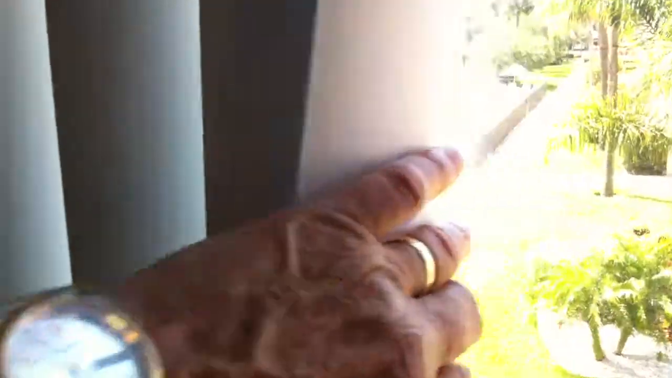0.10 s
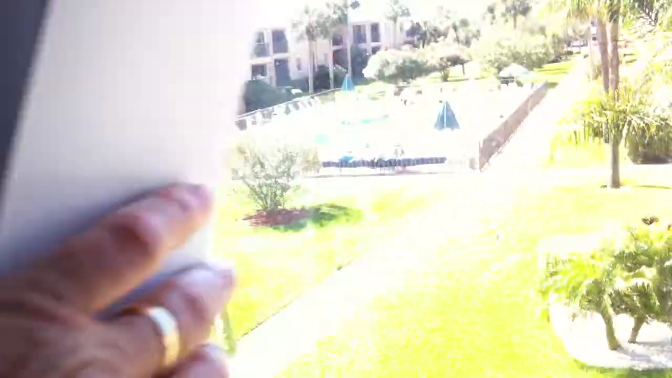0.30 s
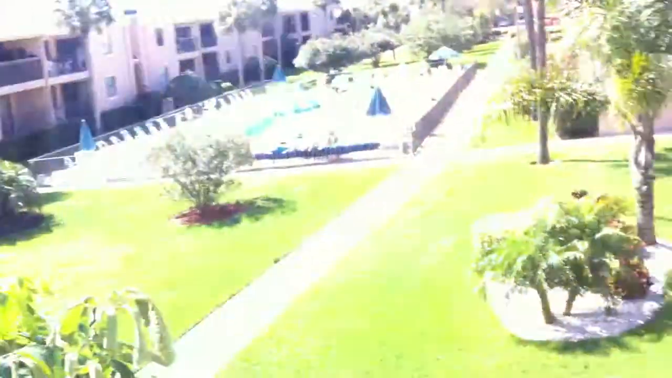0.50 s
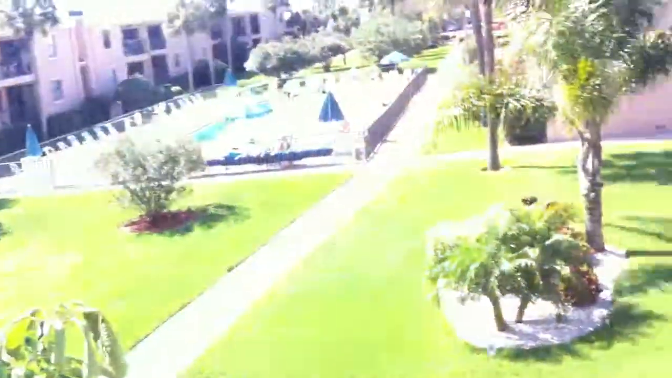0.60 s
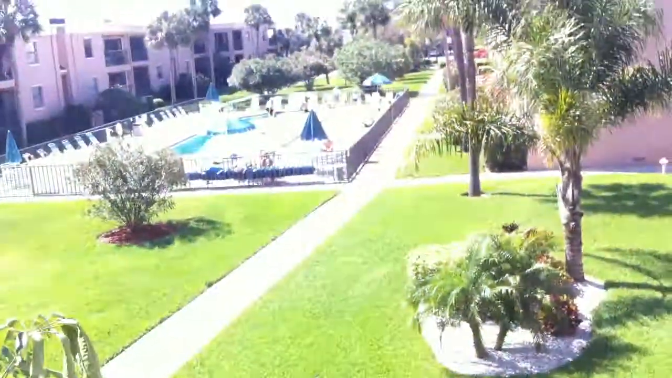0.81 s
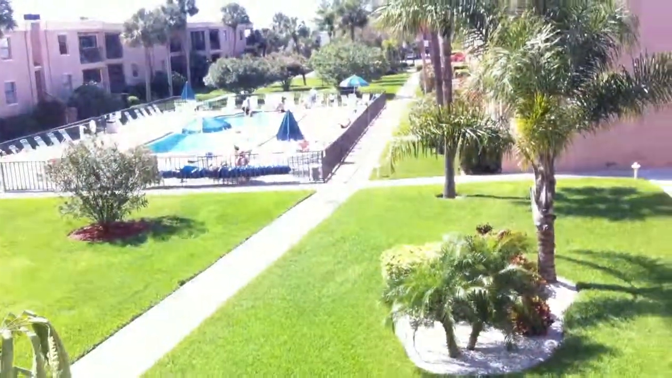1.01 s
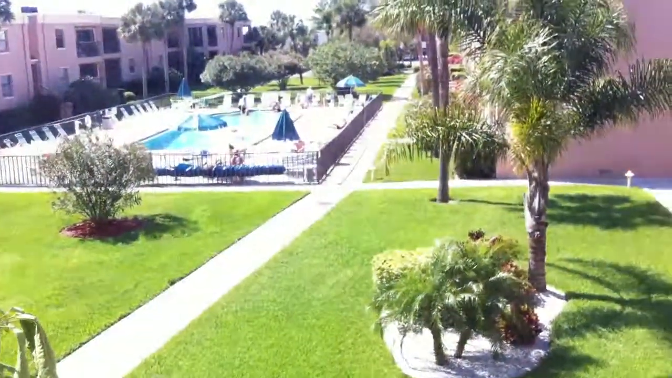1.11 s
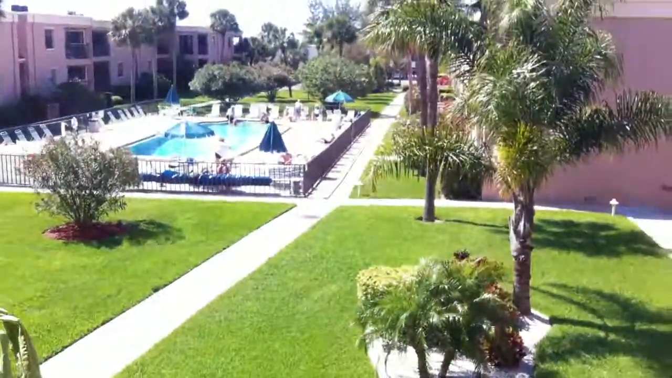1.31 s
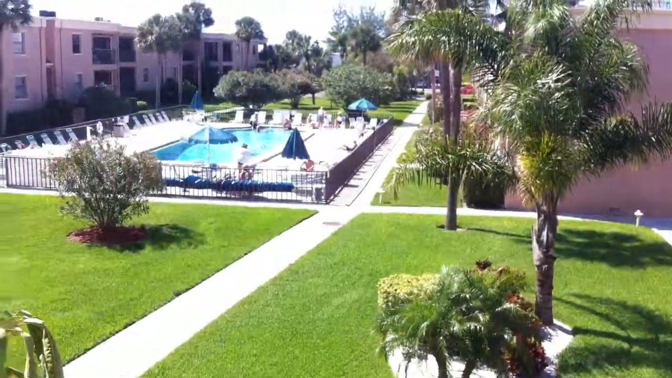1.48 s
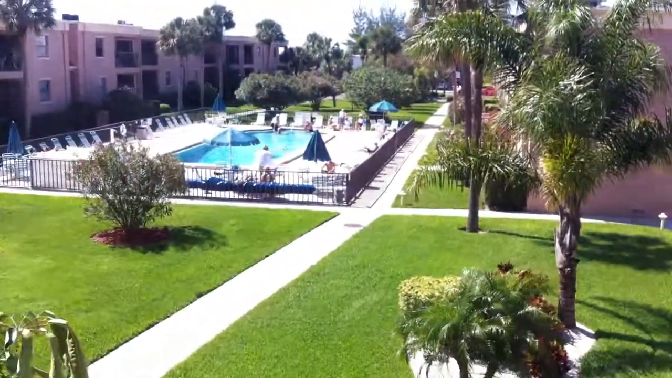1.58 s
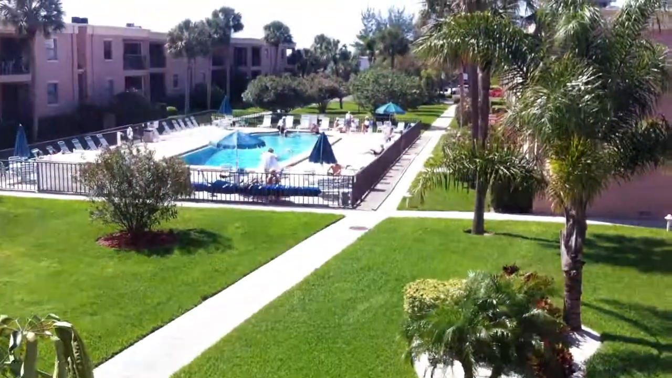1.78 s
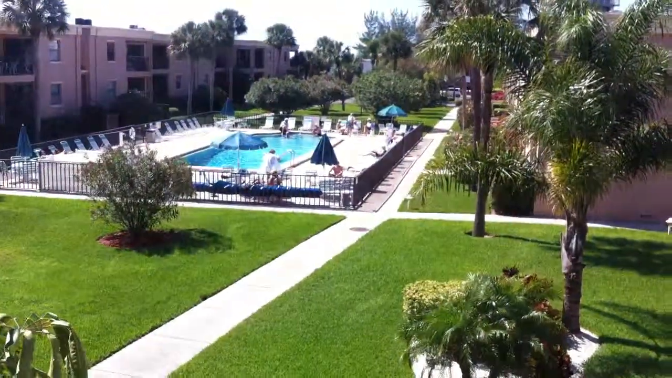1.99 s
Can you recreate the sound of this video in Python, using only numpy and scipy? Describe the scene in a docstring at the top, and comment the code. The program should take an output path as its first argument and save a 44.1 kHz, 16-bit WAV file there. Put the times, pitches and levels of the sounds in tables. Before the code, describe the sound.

Close, slightly thin mono sound of hanging plastic slats rattling in a quiet room; faint ticks first, a rush of scraping and hard clatter, another strong double clack, then thinning taps and soft rustle.

```python
"""Vertical blinds pushed aside

Vertical blinds are pushed aside close to the microphone in a quiet room.
Plastic slats scrape in a rush of tiny slips and slap together in ticks and short runs of contacts.
They swing with a low rustle and clack more lightly; duller knocks and springy low notes join in.
Each contact also rings the blind; a short room echo and steady filtered noise lie underneath."""
import sys
import numpy as np
from scipy import signal
from scipy.io import wavfile
from scipy.ndimage import uniform_filter1d

SR = 44100
rng = np.random.default_rng(int(sys.argv[2]) if len(sys.argv) > 2 else 0)


def to_wav(sig):
    """Store sig (one row per channel, or 1-D mono) as 16-bit WAV at the path in sys.argv[1].

    Samples outside -1..1 are clipped; the rate is SR.
    """
    pcm = np.clip(np.atleast_2d(sig), -1, 1) * 32767
    pcm = np.round(pcm).astype(np.int16)
    wavfile.write(sys.argv[1], SR, pcm.T)  # frames by channels


N = 88200  # length in samples: 2 s

# Spectrum tables give only the shape of a sound; its loudness is set elsewhere. Slat hitting slat, levels
# before the trims below; the first row is a sound already dying away as the scene begins: [t/s, edge tick
# level/dB, body level/dB, middle level/dB, treble level/dB, ring f/Hz, ring level over the middle/dB, chatter
# t60/s]
CLACK_EVENTS = [(0.0014, -29, -48.5, -48, -48, 2430, -6, 0.15),
                (0.047, -55.5, -58.5, -50.5, -63, 2420, -6, 0.094),
                (0.1035, -40, -71, -47, -55, 2540, -3, 0.043),
                (0.1289, -37, -47, -53, -54, 1660, -4, 0.039),
                (0.1462, -48, -78, -48, -49, 2600, -0.5, 0.1),
                (0.2345, -17, -28, -23, -20.5, 1846, -7.5, 0.025),
                (0.3186, -12, -34, -29, -17, 2460, 3, 0.051),
                (0.3353, -11, -30, -24, -26.5, 1840, -20, 0.1),
                (0.3633, -28, -30, -22.5, -51, 3080, -8, 0.082),
                (0.4046, -20, -31.5, -22, -23.5, 2240, -33, 0.12),
                (0.4861, -15, -43, -30, -37, 1570, -25, 0.093),
                (0.6724, -10, -27.5, -16, -20, 1900, -3, 0.062),
                (0.6807, -7, -27, -22, -27.5, 1710, -2.5, 0.072),
                (0.802, -39, -34, -29.5, -29.5, 1820, 3, 0.06),
                (0.8609, -33, -34.5, -36.5, -45, 1940, -3, 0.044),
                (0.8704, -19, -39.5, -44, -52, 1740, 2, 0.065),
                (0.9339, -10, -44, -37, -36.5, 3460, -20, 0.078),
                (0.9407, -44, -43.5, -35, -39, 1725, 1, 0.056),
                (0.9891, -35, -39.5, -33.5, -37.5, 1700, 0, 0.058),
                (0.9984, -25, -48, -33, -38.5, 1620, -5, 0.075),
                (1.0209, -25, -48, -31.5, -45, 1740, -34, 0.066),
                (1.0647, -27, -43.5, -41, -43, 1960, -23, 0.11),
                (1.1022, -30, -67, -39, -46, 2180, -2, 0.044),
                (1.1143, -28, -62, -33.5, -35.5, 2460, -8.5, 0.05),
                (1.1477, -18.5, -65, -34, -35, 1640, -0.5, 0.06),
                (1.2134, -25, -44.5, -44, -46.5, 2470, -2.5, 0.086),
                (1.2334, -28.5, -53, -35, -55, 2020, -9.5, 0.032),
                (1.272, -42, -50, -51, -58, 2700, -11, 0.052),
                (1.3004, -34, -57, -42, -47, 1720, -10, 0.077),
                (1.3886, -27, -33.5, -33, -53, 1510, 2.5, 0.062),
                (1.5314, -34, -56, -49, -46.5, 3290, 4, 0.054),
                (1.5788, -43, -51, -62, -46, 2420, 4, 0.044), (1.611, -40, -66, -60, -44, 2570, 3, 0.036),
                (1.6693, -40, -70, -52, -48, 1600, 1, 0.06),
                (1.6802, -42, -68, -49.5, -48, 2270, 1.5, 0.041),
                (1.763, -33, -60, -47, -49.5, 1640, -16, 0.1),
                (1.8398, -34, -45, -45.5, -49, 2820, -9, 0.043),
                (1.8578, -33, -56, -49, -53, 2920, -3, 0.11),
                (1.9019, -61, -51, -43.5, -50, 2560, -12, 0.028)]
# Spectra of the low, middle and high parts of a clack: [f/Hz, level per Hz/dB]
BODY_SPECTRUM = [(60, -57), (130, -6), (300, -2), (480, 0), (700, 0.5), (1100, 3), (1800, -9.5),
                 (5000, -63)]
MIDDLE_SPECTRUM = [(300, -27.5), (900, -6), (1300, -7), (1800, 3.5), (2700, -0.5), (3600, -4), (5500, -7.5),
                   (12000, -48.5)]
TREBLE_SPECTRUM = [(1000, -42), (3000, -22), (4500, 3.5), (6500, 0.5), (9000, -1), (12000, -7),
                   (16000, -11.5)]
# Spectrum of the edge tick: [f/Hz, level per Hz/dB]
TICK_SPECTRUM = [(100, -4), (600, -12), (2000, -9), (3300, 27.5), (5000, 9), (9000, 10.5), (16000, -33)]
# Dull knocks of whole slats: [t/s, level/dB, t60/s]
KNOCK_EVENTS = [(.235, -30.5, 0.024), (.674, -30, 0.038), (.682, -30.5, 0.04), (.862, -39.5, 0.14),
                (1.225, -60, 0.069), (1.374, -39.5, 0.076), (1.3845, -33, 0.035), (1.389, -32.5, 0.048),
                (1.418, -44.5, 0.057), (1.444, -47.5, 0.099), (1.528, -58, .1), (1.581, -54.5, 0.065),
                (1.701, -36, 0.12), (1.723, -40, 0.059), (1.735, -38.5, 0.065), (1.764, -62, 0.055),
                (1.885, -51, 0.089)]
# Spectrum of the noisy part of a knock: [f/Hz, level per Hz/dB]
KNOCK_SPECTRUM = [(60, -27.5), (150, -8.5), (330, -1.5), (620, -2), (900, 0.5), (1500, -12), (2300, -11.5),
                  (4200, -14), (8000, -25), (16000, -36)]
# Low notes of a knocked slat: [f/Hz, level within the knock/dB, t60/s]
SLAT_MODES = [(267, -10.5, 0.035), (524, -19.5, 0.26), (644, -4, 0.075), (758, -8.5, 0.071),
              (1040, -25, 0.043), (1110, -34, 0.2), (1297, -8, 0.085), (1554, -13, 0.029),
              (1622, -2.5, 0.036)]
# Low bending notes of slats that spring back: [t/s, level before doubling/dB, f/Hz]
FLEX_EVENTS = [(.235, -38, 644), (0.235, -42.5, 275), (0.323, -43.5, 138), (.360, -35.5, 613),
               (0.401, -47.5, 160), (.674, -37, 385), (.677, -32, 455.5), (0.687, -36, 152.4),
               (.885, -45, 399), (1.066, -44, 193.5), (1.272, -51.5, 185), (1.392, -47.5, 205),
               (1.579, -52, 144), (1.894, -55, 182)]
# Loudness curve of slats sliding over each other, before the waver: [t/s, level/dB]
SLIDE_LEVEL = [(.232, -92), (0.24, -31), (.258, -28), (.283, -32.5), (.313, -30), (0.324, -21.5),
               (.332, -29), (.345, -30), (.385, -34), (.402, -31.5), (.412, -25.5), (.424, -38), (.44, -34),
               (.465, -42), (.51, -38.5), (.575, -41), (0.648, -44.5), (.70, -65), (0.724, -35.5),
               (.76, -63), (.85, -46), (.875, -37.5), (.89, -52.5), (1.15, -60), (1.3, -80), (1.57, -77),
               (1.614, -47.5), (1.64, -64.5), (2, -94)]
# Spectrum of the scraping: [f/Hz, level per Hz/dB]
SCRAPE_SPECTRUM = [(80, -32), (200, -18), (600, -8), (1100, -2.5), (1900, 4.5), (3300, 2.5), (5800, 2),
                   (9000, 0), (12000, -3.5), (16000, -11.5)]
# Resonances of the slats and their rail: [f/Hz, gain/dB, t60/s]
BLIND_MODES = [(487, -10, 0.21), (624, -0.5, 0.086), (1120, -5.5, 0.091), (1440, -30, 0.26),
               (1795, -11.5, 0.038), (2310, -21, 0.15), (2395, 1.5, 0.14), (2580, -3, 0.5),
               (3030, -14, 0.3), (5557, 6.5, 0.21), (5780, -1, 0.17)]
# How long the room echo lasts at each frequency: [f/Hz, t60/s]
ROOM_DECAY = [(100, 0.57), (400, 0.53), (900, 0.25), (1600, 0.3), (3000, 0.38), (9000, 0.25), (16000, 0.31)]
# Spectrum of the quiet room: [f/Hz, level per Hz/dB]
HUSH_SPECTRUM = [(25, -15), (50, -48), (95, -10), (125, -3), (185, 7), (240, 1.5), (450, -8), (900, -11),
                 (2400, -5.5), (5000, -13), (10000, -16), (16000, -22)]
# Loudness curve of the rustle of the swaying slats: [t/s, level/dB]
SWAY_LEVEL = [(0, -51.5), (.07, -74), (.15, -56), (.22, -68.5), (.33, -45.5), (.44, -50), (.52, -55),
              (.62, -57.5), (.78, -56), (.88, -51), (.96, -58), (1.161, -54), (1.25, -65.5), (1.35, -63.5),
              (1.45, -61), (1.6, -60.5), (1.66, -86), (1.76, -56), (2, -70.5)]
# Spectrum of that rustle: [f/Hz, level per Hz/dB]
SWAY_SPECTRUM = [(30, -3), (80, -15), (140, -9.5), (200, 0.5), (340, 4.5), (500, -6), (1000, -4),
                 (2500, -29.5), (8000, -33)]

# t60 is the time a sound takes to die away by 60 dB.
BODY_TRIM_DB, MIDDLE_TRIM_DB, TREBLE_TRIM_DB, TICK_TRIM_DB = -2.5, -2.5, 0, -10
BODY_LINGER = 1.67  # the body's t60 as a multiple of the chatter's
CHATTER_RISE_S, CHATTER_GRAIN_DB = 0.00083, 5.5
REBOUND_S, REBOUND_DB = 0.002, 2
RING_T60_S, RING_RISE_S, RING_WIDTH_HZ = 0.04, 0.0009, 232
FLEX_RISE_S, FLEX_T60_S = 0.0042, 0.13
SLIPS_PER_S, SLIP_SPREAD_DB, SLIDE_WAVER_DB = 18000, 1, 1.67
RATTLES_PER_S, RATTLE_LEAST_DB, RATTLE_SPREAD_DB, RATTLE_T60_S = 65, -61.5, 2, 0.02
ROOM_DB, ROOM_DELAY_S, ROOM_FLUTTER_HZ = -9.5, 0.005, 60.07
HUSH_DB = -60
LOW_CUT_HZ, HIGH_CUT_HZ = 81, 16000


def amp(db):
    """Turns decibels into a plain gain."""
    return 10 ** (np.asarray(db) / 20)


def unit(x):
    """Scales a signal to an rms (average strength) of 1."""
    return x / np.sqrt(np.mean(x ** 2) + 1e-20)


def read(points, hz):
    """Reads a curve between its points, along a log-frequency axis."""
    f, value = np.transpose(points)
    return np.interp(np.log(hz + 1), np.log(f + 1), value)


def add(mix, s, sound):
    """Adds a sound to the mix at time s, cutting what runs past the end."""
    part = mix[max(round(s * SR), 0):][:len(sound)]
    part += sound[:len(part)]


def colour(points, size=2048):
    """Makes a filter of energy 1 with the given spectrum that responds as early as it can."""
    hz = abs(np.fft.fftfreq(size, 1 / SR))
    log_gain = np.log(amp(read(points, hz)))
    # The Hilbert transform supplies the phase that puts the energy first.
    response = np.fft.ifft(np.exp(np.conj(signal.hilbert(log_gain)))).real
    return response / np.linalg.norm(response)


def through(x, response):
    """Filters a signal and keeps its length."""
    return signal.fftconvolve(x, response)[:len(x)]


def dying(t, t60, rise):
    """A quick rise, then an exponential decay."""
    return (1 - np.exp(-t / rise)) * np.exp(-np.log(1000) * t / t60)


def chance(per_s):
    """Picks random moments at the given average rate."""
    return rng.random(N) < per_s / SR


def chatter(count, spread_db):
    """Dense tiny contacts of uneven size, evened out to a steady local power."""
    x = rng.standard_normal(count) * amp(spread_db * rng.standard_normal(count))
    local_power = abs(uniform_filter1d(x ** 2, size=130))
    return x / np.sqrt(local_power + 1e-12)


def burst(t, t60):
    """A dying run of contacts, bunched by uneven rebounds."""
    envelope = dying(t, t60, CHATTER_RISE_S)
    rebounds = unit(uniform_filter1d(rng.standard_normal(len(t)), int(REBOUND_S * SR)))
    x = chatter(len(t), CHATTER_GRAIN_DB) * amp(REBOUND_DB * rebounds) * envelope
    # Give the uneven run the same energy as its smooth envelope.
    return x * np.linalg.norm(envelope) / np.linalg.norm(x)


def clacks():
    """An edge ticks, the two slats rebound and chatter against each other, and one rings."""
    out, t = np.zeros(N), np.arange(SR // 4) / SR
    body, tick = colour(BODY_SPECTRUM), colour(TICK_SPECTRUM)
    middle, treble = colour(MIDDLE_SPECTRUM), colour(TREBLE_SPECTRUM)
    tick = tick / abs(tick).max()
    for s, tick_db, body_db, middle_db, treble_db, hz, ring_db, t60 in CLACK_EVENTS:
        sound = amp(body_db + BODY_TRIM_DB) * through(burst(t, t60 * BODY_LINGER), body)

        contacts = burst(t, t60)
        upper = amp(middle_db + MIDDLE_TRIM_DB) * middle + amp(treble_db + TREBLE_TRIM_DB) * treble
        sound += through(contacts, upper)

        # The contacts drive a resonance; keeping only its phase gives a slightly rough tone.
        resonance = t * np.exp(2j * np.pi * hz * t - np.pi * RING_WIDTH_HZ * t)
        tone = np.sin(np.angle(through(contacts, resonance)))
        sound += amp(middle_db + ring_db) * 2 * tone * dying(t, RING_T60_S, RING_RISE_S)

        add(out, s, sound)
        add(out, s, amp(tick_db + TICK_TRIM_DB) * tick)
    return out


def slide():
    """Thousands of tiny slips as the ribbed slats rub over each other."""
    size_db = SLIP_SPREAD_DB * np.minimum(rng.exponential(1, N), 3)
    slips = rng.standard_normal(N) * amp(size_db) * chance(SLIPS_PER_S)
    waver = unit(uniform_filter1d(rng.standard_normal(N), size=300))
    level_db = np.interp(np.arange(N) / SR, *np.transpose(SLIDE_LEVEL))
    return through(unit(slips) * amp(level_db + SLIDE_WAVER_DB * waver), colour(SCRAPE_SPECTRUM))


def knocks():
    """Softer, broader contacts that ring the low modes (natural notes) of a slat."""
    out, t, dull = np.zeros(N), np.arange(SR // 4) / SR, colour(KNOCK_SPECTRUM)
    for s, db, t60 in KNOCK_EVENTS:
        sound = through(burst(t, t60), dull)
        for hz, mode_db, mode_t60 in SLAT_MODES:
            note = np.sin(2 * np.pi * (hz * t + rng.random()))
            sound += amp(mode_db) * note * dying(t, mode_t60, rise=0.00033)
        add(out, s, amp(db) * sound)
    return out


def flexes():
    """A bent slat springs back with a short, low, decaying note."""
    out, t = np.zeros(N), np.arange(SR // 3) / SR
    for s, db, hz in FLEX_EVENTS:
        note = 2 * np.sin(2 * np.pi * hz * t)
        add(out, s, amp(db) * note * dying(t, FLEX_T60_S, FLEX_RISE_S))
    return out


def rattles():
    """Faint chance touches between slats further along the rail, each a burst of noise."""
    size_db = RATTLE_LEAST_DB + RATTLE_SPREAD_DB * np.minimum(rng.exponential(1, N), 3)
    touches = amp(size_db) * chance(RATTLES_PER_S)
    loudness = through(touches, dying(np.arange(SR // 8) / SR, RATTLE_T60_S, CHATTER_RISE_S))
    tone = colour(MIDDLE_SPECTRUM) + 0.44 * colour(TREBLE_SPECTRUM)
    return through(loudness * rng.standard_normal(N), tone)


def sway():
    """The long slats rustle and bump softly while they swing: noise that swells and fades."""
    level_db = np.interp(np.arange(N) / SR, *np.transpose(SWAY_LEVEL))
    return through(rng.standard_normal(N) * amp(level_db), colour(SWAY_SPECTRUM))


def blind_ring(x):
    """Every contact also rings the hanging slats and their rail."""
    t = np.arange(SR // 2) / SR
    response = np.zeros(len(t))
    for hz, db, t60 in BLIND_MODES:
        # This scale makes the table's gain the gain at the peak of the resonance.
        scale = 2 * np.log(1000) / (t60 * SR)
        response += amp(db) * scale * np.cos(2 * np.pi * hz * t) * dying(t, t60, rise=0.00017)
    return through(x, response)


def room(x):
    """A diffuse echo whose bass lasts longest; its fine pattern keeps shifting."""
    count = SR * 3 // 4
    out, delay = np.zeros(N), np.zeros(int(ROOM_DELAY_S * SR))
    for k in range(3):
        # Sparse random reflections die away at a different speed in each frequency band.
        reflections = rng.standard_normal(count) * (rng.random(count) < 0.1)
        hz, t, bands = signal.stft(reflections, SR, nperseg=256)
        decay = np.exp(-np.log(1000) * t / read(ROOM_DECAY, hz)[:, None])
        tail = signal.istft(bands * decay, SR, nperseg=256)[1]
        # The sound moves between three echoes while their total power stays steady.
        turn = 2 * np.pi * ROOM_FLUTTER_HZ * np.arange(N) / SR
        share = np.sqrt(2 / 3) * np.cos(turn + np.pi * k / 3)
        out += through(x * share, np.concatenate([delay, tail / np.linalg.norm(tail)]))
    return out


def hush():
    """The steady background of the room: filtered noise."""
    return amp(HUSH_DB) * unit(through(rng.standard_normal(N), colour(HUSH_SPECTRUM)))


def scene():
    """The blinds in their room, as one channel."""
    contacts = clacks() + slide() + knocks() + rattles()
    blinds = contacts + blind_ring(contacts)
    mix = blinds + flexes() + sway() + amp(ROOM_DB) * room(blinds) + hush()
    return mix[None]


def record(dry):
    """The small microphone's bass roll-off, then the recorder's upper band limit."""
    bass_cut = signal.butter(2, LOW_CUT_HZ, "highpass", fs=SR, output="sos")
    thin = signal.sosfilt(bass_cut, dry)
    band_limit = signal.firwin(401, HIGH_CUT_HZ, window=("kaiser", 8), fs=SR)
    return signal.oaconvolve(thin, band_limit[None], "same")


dry = scene()
out = record(dry)
to_wav(out)
```